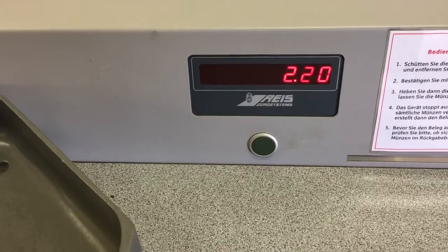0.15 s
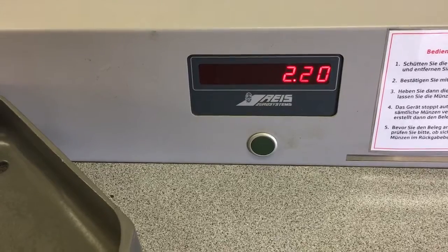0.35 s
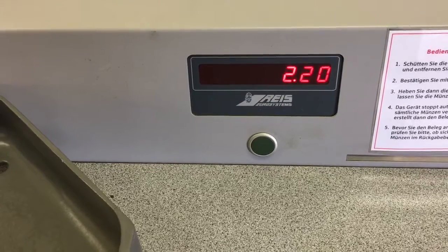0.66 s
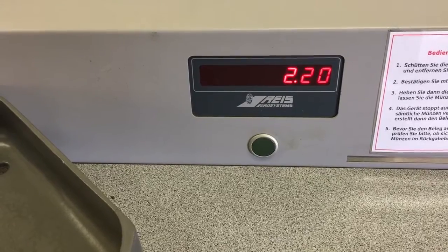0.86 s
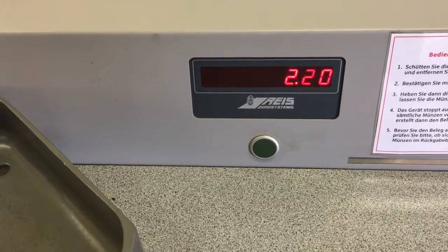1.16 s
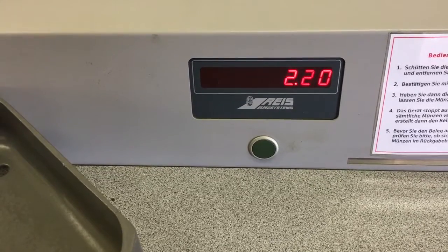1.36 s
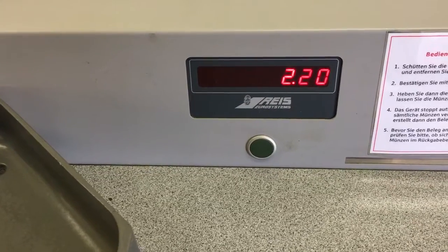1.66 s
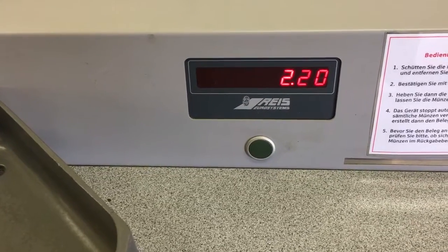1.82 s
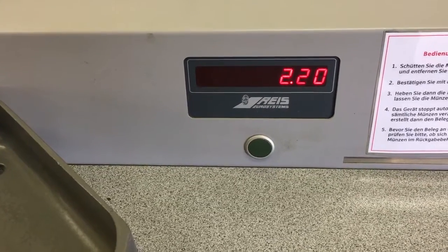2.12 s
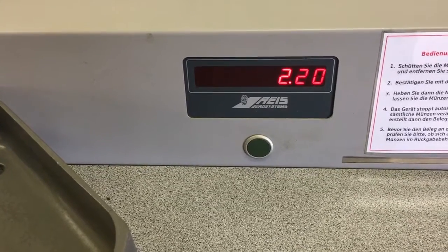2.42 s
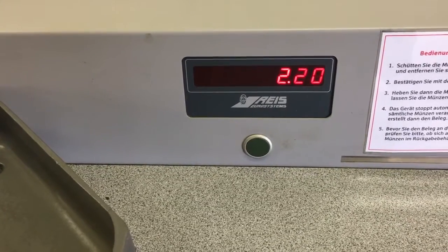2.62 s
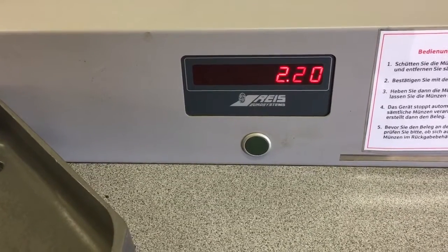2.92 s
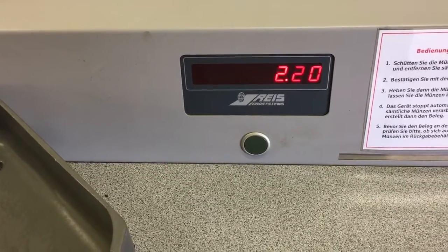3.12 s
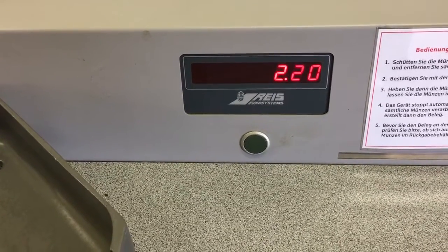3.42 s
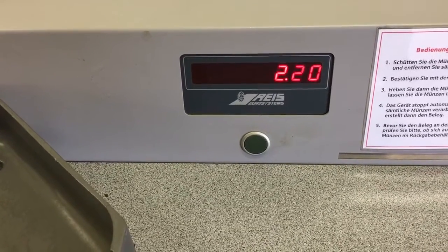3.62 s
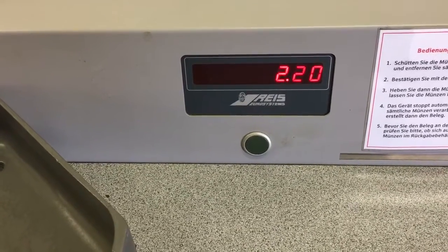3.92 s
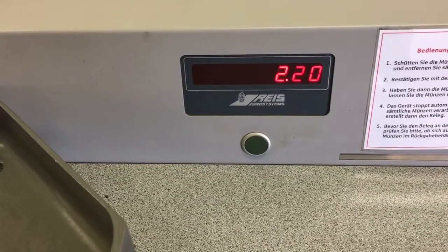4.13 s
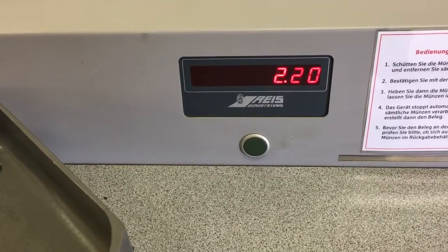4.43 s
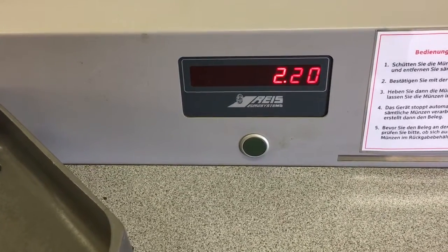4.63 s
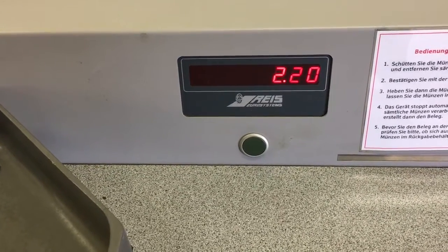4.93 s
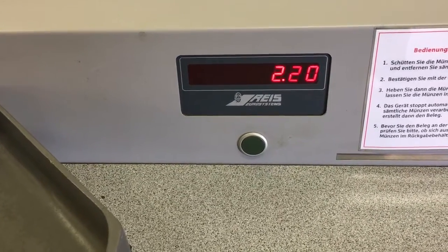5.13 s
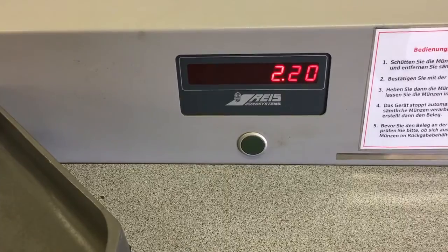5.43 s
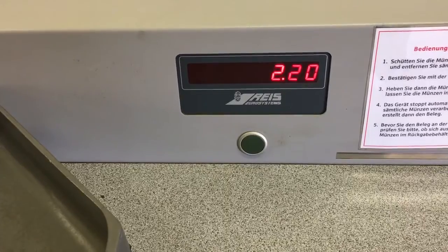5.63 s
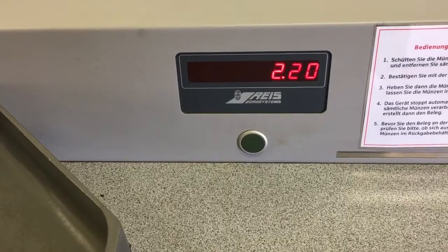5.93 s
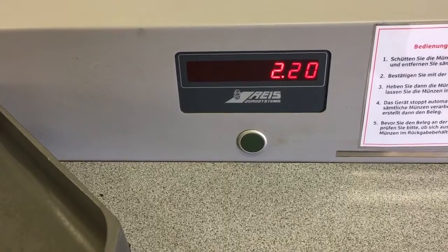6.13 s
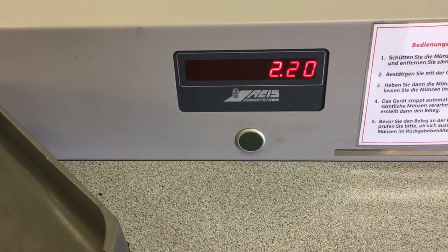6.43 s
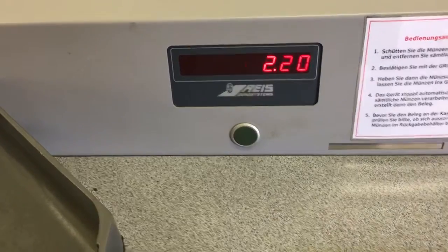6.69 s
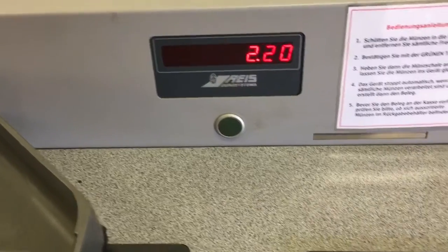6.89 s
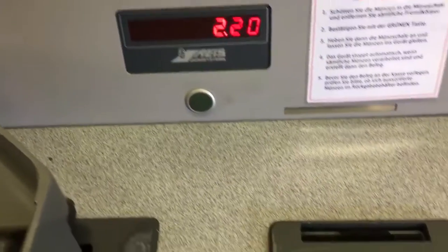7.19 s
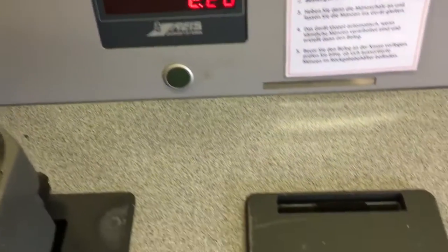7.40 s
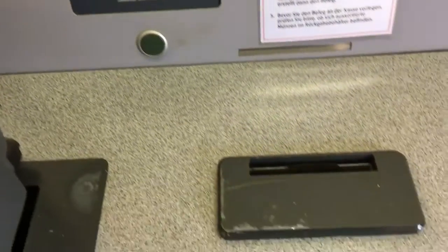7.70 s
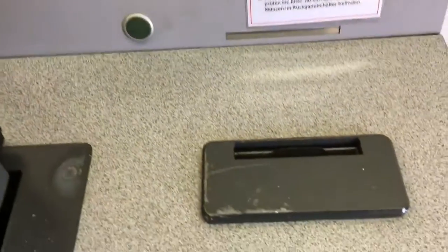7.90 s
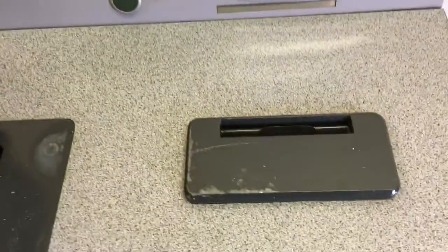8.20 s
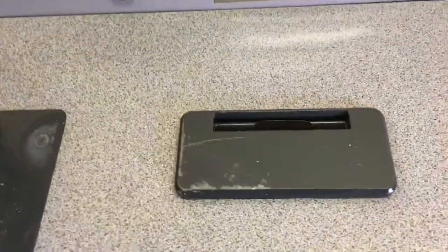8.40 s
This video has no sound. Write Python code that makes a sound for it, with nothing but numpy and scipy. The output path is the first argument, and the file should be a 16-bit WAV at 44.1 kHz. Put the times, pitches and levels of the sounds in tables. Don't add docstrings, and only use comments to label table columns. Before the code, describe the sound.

A close microphone at a steel coin counter in a quiet hall with low air tone. From 0 to 2.3 s a mains motor hums low, a loose disc rattles with occasional knocks, and a belt hisses from about 0.3 s; a tiny bright coin ping comes at 1.9 s. At 2.3 s the drive sags and stops with a dull shudder. From 2.8 to 3.6 s it turns backward with rapid knocks and faint high squeaks, then jolts to rest. At 4.1 s it runs forward again, hiss returning at 4.6 s, a lower ping at 5.1 s, while a heavy vehicle outside adds a deep, slowly rising tone until the end. The motor stops at 6.1 s and a needle printer immediately buzzes in short, bright, uneven strokes until 8.5 s, with droning feed motor, whirr, sharp carriage ticks and triple ratchet clicks, clearer over the slot near 7.6 s.

```python
import sys
import numpy as np
from scipy import signal
from scipy.fft import rfft, irfft
from scipy.io import wavfile
from scipy.ndimage import uniform_filter1d

SR = 44100
rng = np.random.default_rng(int(sys.argv[2]) if len(sys.argv) > 2 else 0)


def nominal_scale(level):
    x = np.asarray(level, float) / 20
    return 10 ** x


def file_out(sig):
    cols = np.atleast_2d(sig).T
    lim = np.clip(cols, -1, 1)
    pcm = np.round(lim * 32767).astype(np.int16)
    wavfile.write(sys.argv[1], SR, pcm)


N = 377055
T = np.arange(N) / SR


def evened(x):
    return x / np.sqrt(np.mean(x ** 2) + 1e-20)


def hiss_source():
    return rng.standard_normal(N)


def drift(seconds):
    size = max(int(seconds * SR), 1)
    return evened(uniform_filter1d(uniform_filter1d(hiss_source(), size), size))


def coloured(x, points):
    f, db = np.transpose(points)
    hz = np.fft.rfftfreq(N, 1 / SR)
    gain_db = np.interp(np.log(hz + 1), np.log(f), db, -90, -90)
    return evened(irfft(rfft(x) * nominal_scale(gain_db), N))


def ring(x, hz, width):
    return signal.lfilter(*signal.iirpeak(hz, hz / width, SR), x)


def body(x, modes):
    return sum((-1) ** k * nominal_scale(db) * ring(x, hz, width) for k, (hz, width, db) in enumerate(modes))


def resonate(x, hz, width):
    turn = np.exp(2j * np.pi * np.cumsum(hz * np.ones(N)) / SR)
    r = np.exp(-np.pi * width / SR)
    smooth = signal.lfilter([1 - r], [1, -r], x / turn + 1e-18)
    return 2 * (turn * smooth).real


def bursts(rows, rise):
    out = np.zeros(N)
    for s, db, fall in rows:
        at = slice(int(s * SR), int((s + 10 * fall) * SR))
        u = np.maximum(T[at] - s, 0)
        out[at] += nominal_scale(db) * (1 - np.exp(-u / rise)) * np.exp(-u / fall)
    return out


def running(rows, up, down):
    ramps = [db - up * np.maximum(on - T, 0) - down * np.maximum(T - off, 0) for on, off, db in rows]
    return np.maximum(np.max(ramps, axis=0), -120)


def cabinet(x, t60=0.21, wet_db=-13):
    t = np.arange(SR // 2) / SR
    noise = rng.standard_normal(len(t))
    dull = signal.lfilter([.4], [1, -.6], noise)
    bright = noise - dull
    tail = dull * nominal_scale(-60 * t / t60) + 0.68 * bright * nominal_scale(-60 * t / (0.31 * t60))
    return x + nominal_scale(wet_db) * signal.oaconvolve(x, tail / np.linalg.norm(tail))[:N]


# (f/Hz, level/dB per Hz)
HALL_TONE = [(12, -37), (20, -16), (49, -10.5), (134, -11.5), (210, -9), (328, -28), (367, -26),
             (472, -30.5), (1120, -25.5), (1330, -30), (1480, -30), (2820, -46.5), (16000, -85)]


def hall():
    return nominal_scale(-50) * coloured(hiss_source(), HALL_TONE)


# (multiple of 100 Hz, level/dB, phase/rad)
HUM_ORDERS = [(2, -10, 0.12), (3, -20.5, 1.18), (4, -14, 2.85), (5, -35, 0.1)]
# (at full speed t/s, switched off t/s, hum level/dB, casing rumble level/dB)
MOTOR_RUNS = [
    (-1, 2.29, -31.5, -41),
    (2.884, 3.59, -34, -42),
    (4.195, 6.06, -31.5, -41),
]
# (f/Hz, width/Hz, level/dB)
CASING = [(82, 23, -2.5), (162.4, 51, -2), (194.4, 51.3, -0.5), (300.2, 39.4, -1.5), (381.7, 55, -1),
          (582, 138, -8)]


def motor():
    hum_db = running([(on, off, db) for on, off, db, _ in MOTOR_RUNS], 170, 195)
    casing_db = running([(on, off, db) for on, off, _, db in MOTOR_RUNS], 110, 53)
    belt_load = nominal_scale(running([(on, off, 0) for on, off, _ in BELT_RUNS], 100, 30))
    casing_db += 2 * belt_load
    turn = 2 * np.pi * 100 * T + 1.0 + .17 * drift(.03)
    hum = np.sin(turn) * nominal_scale(3 + .5 * drift(0.011))
    for k, db, phase in HUM_ORDERS:
        hum += nominal_scale(0.5 + db + 0.83 * drift(0.028)) * np.sin(k * turn + phase)
    shaken = hiss_source() * (1 + .5 * np.cos(turn))
    casing = evened(body(body(shaken, CASING), CASING))
    return nominal_scale(hum_db) * hum + nominal_scale(casing_db - 2.0) * casing


# (at full level t/s, starts to fade t/s, rattle level/dB, fading/dB per s)
DISC_RUNS = [
    (-1, 2.36, -49.5, 90),
    (2.874, 2.9, -55, 8),
    (4.112, 6.12, -51, 90),
]
# (f/Hz, level/dB per Hz)
DISC = [(290, -49), (500, -3.5), (784, -14), (1080, -10), (1230, -8), (2100, -16.5), (2540, -17),
        (3340, -23), (3980, -25), (6420, -24), (7210, -27), (13100, -38.5), (16000, -43)]
# (f/Hz, width/Hz, level/dB)
DISC_RINGS = [(1220, 270, 6.5), (1660, 350, 5.5), (2560, 370, -7), (2970, 160, -21), (4070, 86, 6.5),
              (6440, 740, -17.5)]
# (t/s, peak level/dB)
KNOCKS = [(0.9444, -47), (1.3494, -50), (1.5544, -43), (1.9315, -46), (2.1344, -41.5), (2.8389, -56),
          (2.8704, -47), (2.8973, -48), (2.9587, -49), (3.029, -57), (3.0694, -49), (3.11, -46),
          (3.161, -40.5), (3.198, -49), (3.241, -40.5), (3.2869, -52), (3.362, -42.5), (3.4072, -52),
          (3.4521, -43), (3.4844, -49), (3.527, -48), (3.558, -49.5), (3.6087, -53), (3.6494, -61),
          (3.695, -65), (3.7808, -71), (3.927, -56), (4.0556, -46.5), (4.7844, -45.5), (5.1024, -46)]


def disc():
    disc_db = np.max([running([(on, off, db)], 700, coast) for on, off, db, coast in DISC_RUNS], axis=0)
    let_go = np.clip((T - 3.63) / 0.066, 0, 1) * (T < DISC_RUNS[2][0] - .03)
    disc_db += -5.5 * let_go
    grit, scrape = hiss_source(), hiss_source()
    metal = coloured(grit, DISC) + 0.47 * evened(body(scrape, DISC_RINGS))
    lugs = bursts([(s, db, .012) for s, db in KNOCKS], rise=0.0019)
    return (nominal_scale(disc_db + 2 + 0.94 * drift(0.0083)) + lugs) * metal


COAST_DB = [9, 0]


def whine_track():
    lead_s, coast_s = 0.024, .115
    free = [((T - off + lead_s) * (T < off + 1)).clip(0) for _, off, _ in BELT_RUNS]
    level_db = running([(on, off + coast_s - lead_s, -52) for on, off, _ in BELT_RUNS], 400, 330)
    level_db += sum(db * np.minimum(f / 0.046, 1) for f, db in zip(free, COAST_DB))
    hz = np.maximum(937 - 3600 * sum(free), 300)
    return hz, level_db


# (clutch in t/s, clutch out t/s, hiss level/dB)
BELT_RUNS = [
    (.3, 2.3, -53.4),
    (4.57, 6.08, -53.2),
]
# (f/Hz, level/dB per Hz)
BELT_HISS = [(410, 3), (700, -7), (819, -16.5), (946, 1), (1480, -11), (1770, -12.5), (2000, -12),
             (3600, -27), (4050, -15.5), (4860, -23.5), (5990, -18), (11400, -26), (16000, -31)]
# (f/Hz, width/Hz, level/dB)
BELT_RINGS = [(1080, 60, 4), (1450, 150, 8), (1950, 95, 4), (2270, 110, 0), (6100, 300, -3),
              (6900, 300, -4), (7600, 300, -6), (10000, 300, -3), (11200, 400, -3), (12700, 400, -7),
              (13600, 300, -9), (15000, 300, -8)]
# (t/s, f/Hz, level/dB, t60/s)
PINGS = [
    (1.932, 12090, -49, .17),
    (1.955, 10000, -60, .1),
    (5.112, 4630, -46, .14),
    (5.11, 12100, -61, .15),
]


def belt():
    grit, scrape = [hiss_source() * nominal_scale(swell) for swell in [1.3 * drift(.004) + 1.0 * drift(.02)] * 2]
    hiss = coloured(grit, BELT_HISS) + .5 * evened(body(scrape, BELT_RINGS))
    hz, whine_db = whine_track()
    whine = evened(resonate(hiss_source(), hz, 56))
    out = nominal_scale(running(BELT_RUNS, 500, 240) + 6.0) * hiss + nominal_scale(whine_db) * whine
    for s, ping_hz, db, t60 in PINGS:
        out += bursts([(s, db, t60 / np.log(1000))], rise=0.00062) * np.sin(2 * np.pi * ping_hz * T)
    return out


# (t/s, level/dB, decay/s)
SHUDDERS = [
    (2.33, -41, .1),
    (2.45, -46, .05),
    (2.78, -45, .056),
    (3.62, -38, .063),
    (3.85, -47, .054),
    (4.055, -38, .04),
    (6.1, -41, .08),
    (6.25, -49, .042),
]


def shudder():
    frame = evened(ring(ring(hiss_source(), 91, 35), 91, 35))
    return bursts(SHUDDERS, rise=0.0076) * frame


# (from t/s, to t/s, level/dB)
SQUEAKS = [
    (2.83, 2.9, -66),
    (2.95, 3.1, -71),
    (3.33, 3.45, -68),
    (3.6, 3.87, -74),
]


def squeal():
    rub = hiss_source() * nominal_scale(1.2 * drift(0.013) + 2.1 * drift(0.06))
    partials = 0
    for k in (1, 1.185):
        hz = k * 5390 * (1 + .006 * drift(.05))
        partials = partials + evened(resonate(rub, hz, 160)) / k
    return nominal_scale(running(SQUEAKS, 400, 100) - 4) * partials


# (t/s, f/Hz, level/dB)
VEHICLE = [
    (4.35, 35.4, -58),
    (4.7, 37.2, -43),
    (5.15, 40.3, -43),
    (5.28, 41, -56),
    (5.5, 43.66, -44),
    (6.79, 49.4, -46.5),
    (7.38, 44, -51),
    (7.7, 51.8, -48),
    (8.22, 51, -44.5),
    (8.55, 50.1, -58),
]


def vehicle():
    s, f, level = np.transpose(VEHICLE)
    hz = np.interp(T, s, f, 0, 0)
    db = np.interp(T, s, level, -100, -100)
    return nominal_scale(db + 4.5 + .6 * drift(0.05)) * np.sin(2 * np.pi * np.cumsum(hz) / SR)


# (t/s, peak level/dB, decay/s)
TICKS = [(6.083, -35, .0074), (6.1, -32, 0.0085), (6.323, -33, .013), (6.339, -31, 0.011),
         (6.4594, -37, .013), (6.675, -29, 0.014), (6.6914, -31, 0.0081), (6.699, -33, .0084),
         (6.778, -38, .012), (7.1433, -24, 0.0046), (7.21, -42, 0.017), (7.2274, -37, .017),
         (7.337, -26, 0.0087), (7.521, -23.5, 0.0019), (7.595, -46, .0081), (7.85, -24.5, 0.0061),
         (7.926, -36, 0.016), (7.9935, -18.5, 0.0035)]
# (t/s, peak level/dB, tooth spacing/s)
ADVANCES = [
    (6.389, -32.5, 0.013),
    (6.849, -32, 0.013),
    (6.919, -34, 0.013),
    (8.078, -35, .013),
    (8.148, -34, 0.0137),
    (8.397, -33, .018),
]
TOOTH_DB = [-1.5, 2, 0]


def carriage_and_ratchet():
    teeth = [(s + k * gap, peak + step, 0.0092) for s, peak, gap in ADVANCES for k, step in enumerate(TOOTH_DB)]
    return nominal_scale(4) * bursts(TICKS + teeth, rise=0.00043) * hiss_source()


# (t/s, level/dB)
SURGES = [
    (6.41, -39),
    (6.68, -37),
    (6.93, -39),
    (7.23, -40),
    (7.45, -43),
    (7.74, -44.5),
]
# (from t/s, to t/s, level/dB)
RESTS = [
    (7.1, 7.15, -12),
    (7.38, 7.444, -14),
]
# (f/Hz, level/dB per Hz)
FEED_DRONE = [(35, -24), (60, -16.5), (75, -9.5), (114, -4.5), (135, -16), (200, -12), (355, -2),
              (446, -10), (766, -28.5), (800, -14), (1040, -21), (1760, -120)]
FEED_WHIRR = [(410, 7), (700, 7), (1260, 3.5), (1870, 6), (2700, 0), (3690, 0), (4860, -5.5), (5840, -4.5),
              (16000, -29)]


def feed_motor(gate):
    rest_db = uniform_filter1d(sum(dip * (T > a) * (T < b) for a, b, dip in RESTS), 600)
    pull = nominal_scale(-47 + rest_db) + bursts([(s, surge, .06) for s, surge in SURGES], rise=0.0096)
    drone = pull * coloured(hiss_source(), FEED_DRONE)
    load_db = 6.0 * uniform_filter1d(1. * gate, 400) + 1.5 * drift(.01)
    whirr = nominal_scale(-48.3 + 0.19 * rest_db - 2.5 + load_db) * coloured(hiss_source(), FEED_WHIRR)
    return (T > 6.1) * (drone + whirr)


# (start t/s, length/s, head level/dB, head resonance f/Hz, step tone level/dB)
STROKES = [(6.132, .106, -29.5, 3870, -41), (6.237, .071, -35, 4000, -47), (6.472, .059, -32, 3920, -44),
           (6.53, .061, -36.5, 3940, -56), (6.59, .065, -36, 3840, -42), (6.793, .047, -38, 3850, -52),
           (7.016, .059, -33, 3830, -41), (7.179, .034, -33, 3810, -42), (7.279, .044, -36, 3750, -42),
           (7.444, .032, -36, 3630, -41), (7.607, .04, -37, 3540, -55), (7.655, .069, -36.5, 3720, -45),
           (7.791, .031, -36, 3780, -48), (7.87, .023, -35, 3370, -57), (7.961, .024, -32, 3390, -48),
           (8.019, .047, -38, 3540, -44), (8.202, .029, -38, 3520, -48), (8.282, .038, -34, 3400, -57),
           (8.361, .036, -35, 3540, -45), (8.467, .082, -44, 3560, -53)]


def words():
    start, length, *columns = np.transpose(STROKES)
    k = np.maximum(np.searchsorted(start, T) - 1, 0)
    into = T - start[k]
    gate = (into >= 0) & (into < length[k] + .0005)
    return gate, into, length[k] - into, *(uniform_filter1d(c[k], 130) for c in columns)


SLOT_HZ = 1893.7


def needles(evenness, regular=.72, jitter_s=12e-6):
    slots = np.arange(2, int(N / SR * SLOT_HZ) - 2)
    letter = signal.lfilter([1], [1, -.9], rng.standard_normal((len(slots) // 10 + 1, 10)), axis=0)
    clock = np.interp(slots / SLOT_HZ, T, evenness) * (.9 + .22 * (-1.) ** slots)
    steady = clock + 1.34 * evened(letter.ravel()[:len(slots)])
    chance, late = rng.standard_normal((len(slots), 2)).T
    force = evened(regular * steady + (1 - regular) * chance)
    force = np.clip(force, -1.5, 1.7)
    fine = np.zeros(4 * N)
    fine[((slots / SLOT_HZ + jitter_s * late) * SR * 4).astype(int)] = force
    blows = evened(signal.resample_poly(fine, 1, 4))
    return blows + .22 * hiss_source()


# (f/Hz, width/Hz, level/dB)
PANEL = [(1000, 670, -6), (1900, 220, -4.5), (2640, 450, -9), (6550, 340, -4.5), (8230, 740, -3.5),
         (9940, 540, -4), (11600, 1600, -6.5), (15100, 2600, -11.5)]
SLOT = [(954, 220, -4.5), (1820, 360, -21), (3950, 250, -3.5), (5410, 165, 0), (6770, 690, -2),
        (8730, 800, -3.5), (9600, 490, -1.5), (11900, 2000, -5.5), (15100, 3000, -11)]
# (t/s, share 0-1)
LEANING = [
    (7.25, 0),
    (7.6, 1),
    (7.9, 0.8),
]


def print_head(drive, head_hz, bright_db):
    low = 1.25 * resonate(resonate(drive, head_hz, 430), head_hz, 430)
    high = 1.1 * ring(ring(drive, 5830, 700), 5830, 700)
    share = np.clip(np.interp(T, *np.transpose(LEANING)), 0, 1)
    frame = (1 - share) * body(body(drive, PANEL), PANEL) + share * body(body(drive, SLOT), SLOT)
    return low + nominal_scale(-4 + .5 * bright_db) * high + nominal_scale(bright_db) * frame


def step_tone(gate, into, left, tone_db):
    throb = 1 + .5 * np.cos(2 * np.pi * SLOT_HZ / 10 * T + 1.2 * drift(0.045))
    built = 1 - np.exp(-np.maximum(into, 0) / 0.009)
    built *= np.exp(np.minimum(left, 0) / 0.024) * np.where(gate, 1, .6)
    tone = built * nominal_scale(tone_db + 3.0 + 2.3 * drift(0.012)) * throb * np.sin(2 * np.pi * SLOT_HZ * T)
    return ring(tone, SLOT_HZ, 460)


def printer():
    gate, into, left, db, head_hz, tone_db = words()
    bright_db = np.where(gate, (1 - 0.31) * (-34 - db), 3)
    evenness = np.clip(.62 + .045 * (tone_db + 44), .1, .62)
    lift_db = -8 * np.clip(1 - left / 0.0088, 0, 1)
    blows = gate * needles(evenness) * nominal_scale(db + 14.0 + lift_db + 2.8 * drift(.003))
    head = print_head(blows + carriage_and_ratchet(), head_hz, bright_db)
    return head + step_tone(gate, into, left, tone_db), feed_motor(gate)


def scene():
    works = cabinet(belt() + squeal(), t60=.12, wet_db=-9)
    head, feed = printer()
    return (hall() + motor() + disc() + works + shudder() + vehicle() + cabinet(head) + feed)[None]


def roll_off(x):
    return signal.sosfilt(signal.butter(12, 16490, fs=SR, output="sos"), x)


def record(dry):
    level_db = 10 * np.log10(abs(uniform_filter1d(dry ** 2, 90, axis=1)) + 1e-12)
    over_db = uniform_filter1d(np.maximum(level_db + 29, 0), 90, axis=1)
    held = dry / nominal_scale(.6 * over_db)
    edge = signal.firwin(1001, 15730, window=("kaiser", 5), fs=SR)
    return roll_off(signal.oaconvolve(held, edge[None], "same"))


dry = scene()
out = record(dry)
file_out(out)
```